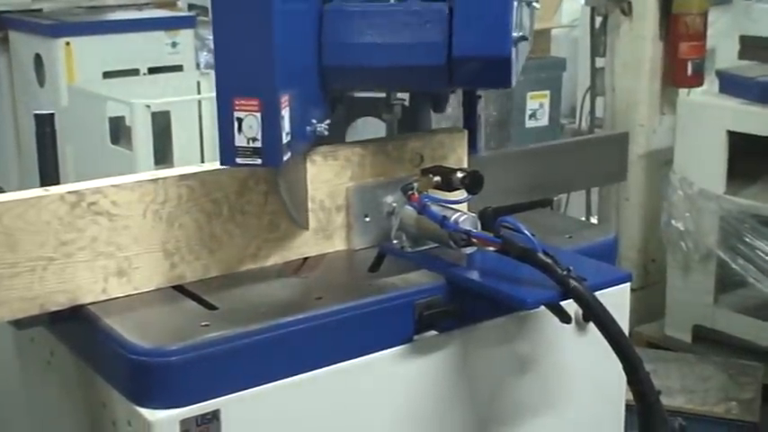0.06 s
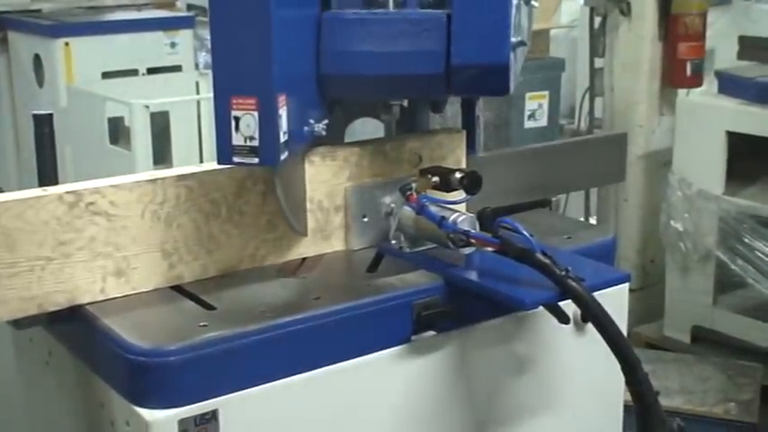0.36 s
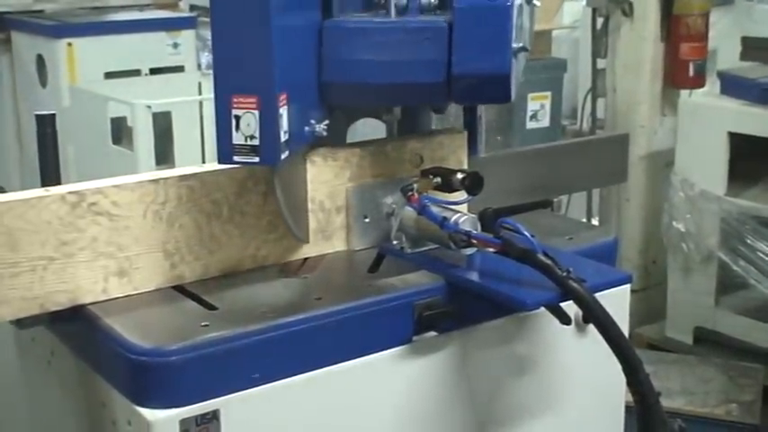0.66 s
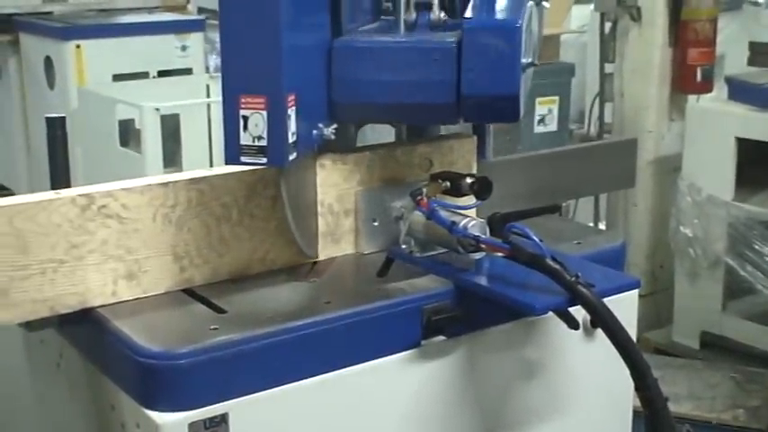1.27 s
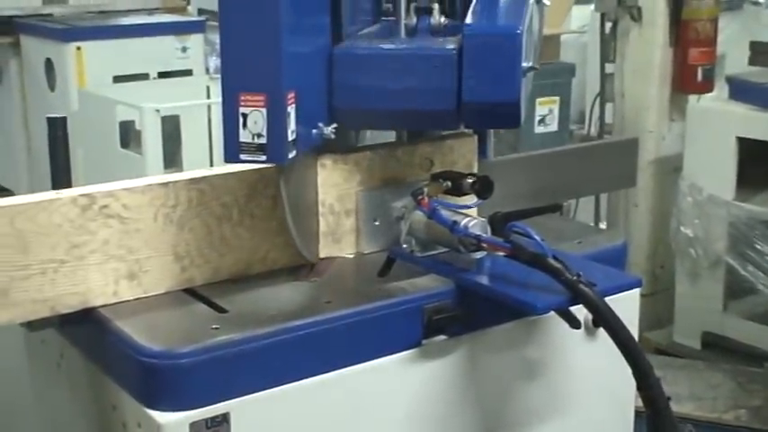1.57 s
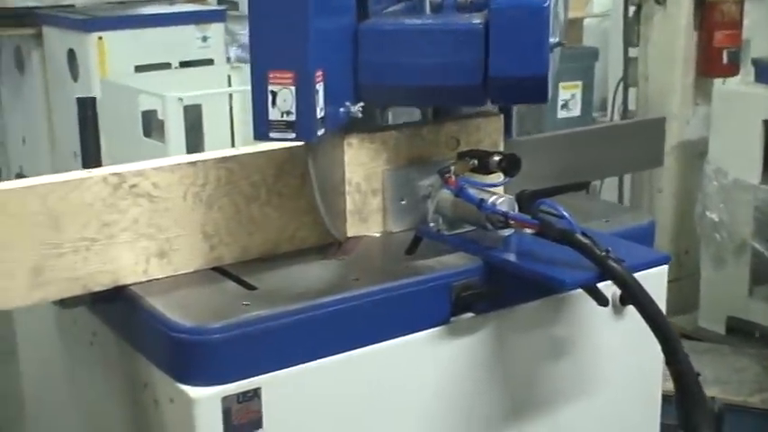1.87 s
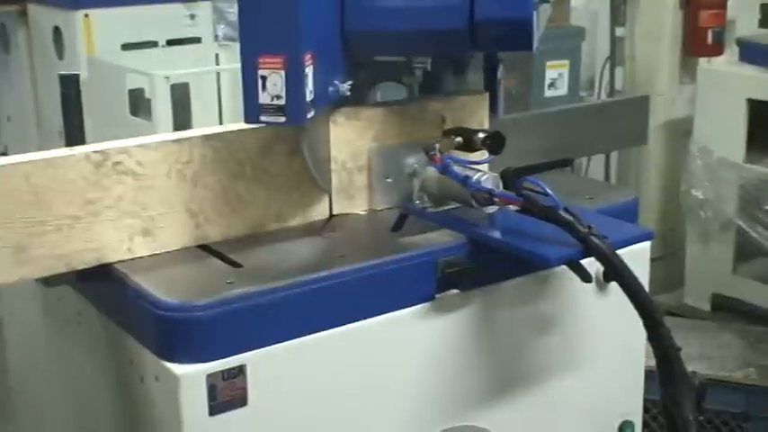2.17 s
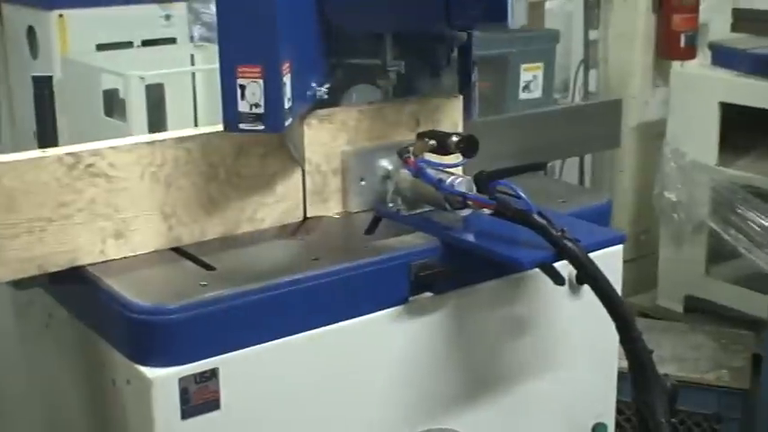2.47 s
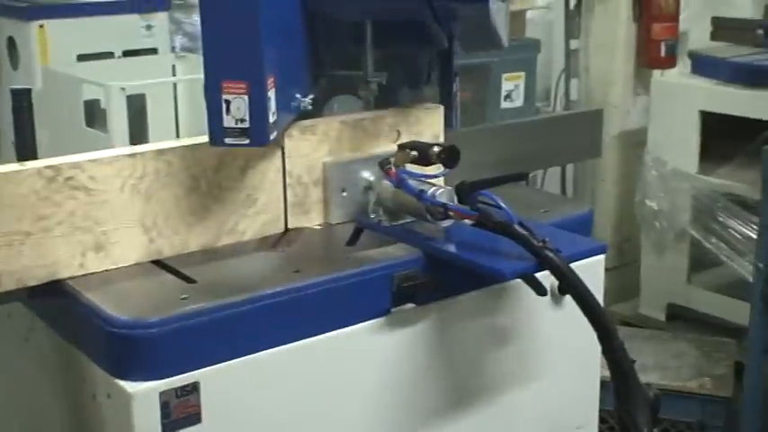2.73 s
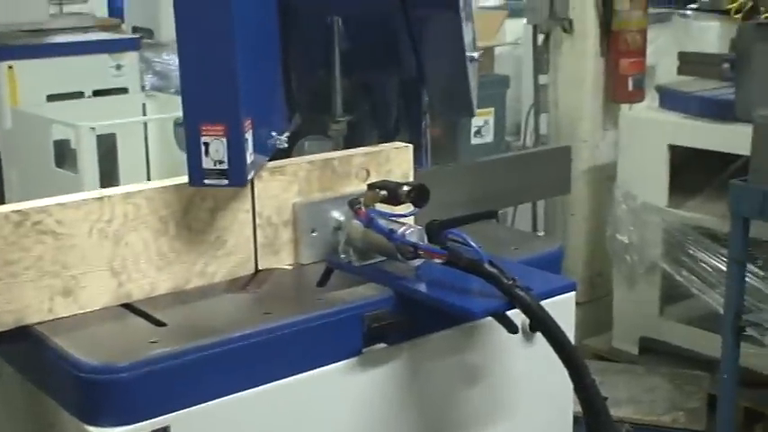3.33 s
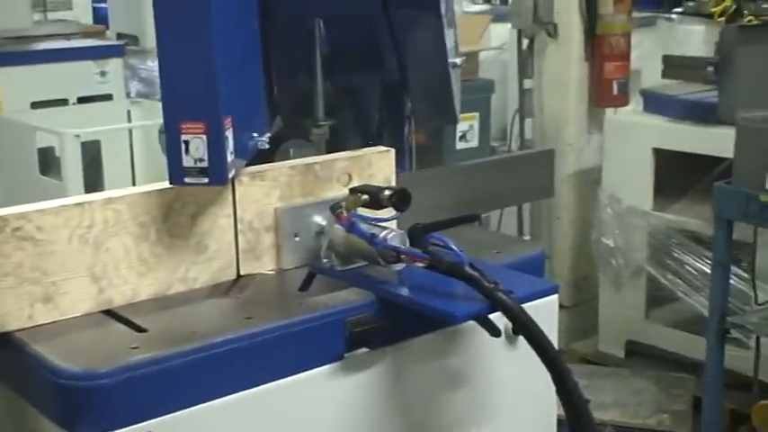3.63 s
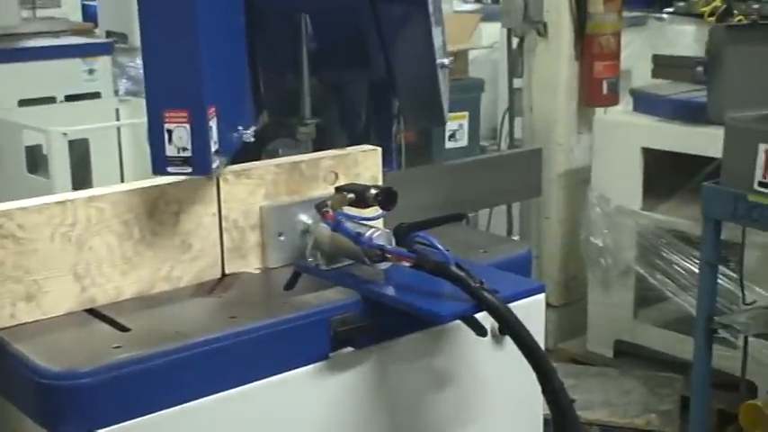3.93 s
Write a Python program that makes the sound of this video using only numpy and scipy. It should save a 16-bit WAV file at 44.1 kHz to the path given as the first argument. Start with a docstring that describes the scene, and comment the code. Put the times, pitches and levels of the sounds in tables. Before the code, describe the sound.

A powered mitre saw whines into a wooden board, tearing off chips. From about 1.3 seconds it slows slightly and gives a rough, pulsing rasp. Compressed air starts hissing at 1.6 seconds. From 2 seconds the rising blade rubs in its slot with brief high tones while the board drones. Saw and hiss fade by about 3.4 seconds, leaving the dust extractor that rushes and hums throughout.

```python
"""A pneumatic mitre saw cuts a clamped board while a dust extractor rushes and hums throughout.
First the teeth whine as they enter the wood and tear off chips. Deep in the cut the blade slows
a little and rasps once a turn. Then compressed air hisses through the return stroke, and the rising
blade rubs in its slot with brief high tones while the board drones. The saw fades, leaving the extractor."""
import sys
import numpy as np
from scipy import signal
from scipy.fft import rfft, irfft
from scipy.io import wavfile
from scipy.ndimage import uniform_filter1d

SR = 44100
rng = np.random.default_rng(int(sys.argv[2]) if len(sys.argv) > 2 else 0)


def dump_mix(stems):
    """Bounce the given channels to the path in sys.argv[1] as a 16-bit WAV at rate SR."""
    frames = np.atleast_2d(stems).T  # one column per channel
    limited = np.clip(frames, -1, 1)  # hard clip at full scale
    pcm = np.round(limited * 32767).astype(np.int16)
    wavfile.write(sys.argv[1], SR, pcm)


N = 176400
TIME_S = np.arange(N) / SR
TOP_HZ = 16750


def undb(db):
    """Turns decibels into a gain."""
    return 10 ** (np.asarray(db) / 20)

def curve(table, column=1):
    """Joins a table's points in time with straight lines."""
    rows = np.array(table, float)
    return np.interp(TIME_S, rows[:, 0], rows[:, column])

def colour(table, hz):
    """Looks up a table's gain at each frequency."""
    rows = np.array(table, float)
    return undb(np.interp(np.log(hz + 1), np.log(rows[:, 0]), rows[:, 1]))

def wander(rate_hz):
    """A smooth random wiggle, typically of size 1."""
    hold = max(int(SR / rate_hz), 2)
    steps = np.repeat(rng.standard_normal(N // hold + 1), hold)
    smooth = uniform_filter1d(uniform_filter1d(steps, hold), hold)[:N]
    return smooth / smooth.std()

def pan(x, left_db):
    """Makes a sound louder on the left than on the right."""
    return x * undb(np.array([[left_db], [-left_db]]) / 2)

# Reflections compared with the direct sound: frequency_hz, level_db
REFLECTIONS = [(60, -33), (700, -10.5), (1500, -13.5), (4400, -13.5), (8100, -3.5), (13000, -19.5)]
# How far the direct sound leans left: frequency_hz, left_minus_right_db
LEFT_LEAN = [(60, 1), (400, 4), (4400, -.5), (8100, 1), (15000, 3)]
def spread(direct, reflected):
    """Mixes a sound and its reflections into stereo."""
    hz = np.fft.rfftfreq(N, 1 / SR)
    mid = rfft(direct)
    side = rfft(reflected) * colour(REFLECTIONS, hz)
    lean = np.sqrt(colour(LEFT_LEAN, hz))
    return irfft(np.array([mid * lean + side, mid / lean - side]), N)

def noise(table, grain_db=0):
    """Stereo noise: the table sets its colour, not its level; grain makes it gritty."""
    hz = np.fft.rfftfreq(N, 1 / SR)
    white = rng.standard_normal((2, N)) * undb(grain_db * wander(3000))
    bass_cut = hz ** 4 / (hz ** 4 + 58 ** 4)
    x = irfft(rfft(white) * colour(table, hz) * bass_cut, N)
    return spread(*(x / x.std()))

def tone(cycles, flutter_db, flutter_hz, jitter_rad):
    """A tone whose level flutters; jitter makes it rough."""
    flutter = undb(flutter_db * wander(flutter_hz))
    x = flutter * np.sin(2 * np.pi * cycles + jitter_rad * wander(90))
    return x / x.std()

# Colour of the suction: frequency_hz, level_db
SUCTION_COLOUR = [(55, -12), (105, -2), (400, -3), (820, -7), (1400, -0.5), (2250, 1), (3600, -8),
                  (5500, -11.5), (7800, -17.5), (9200, -12.5), (11000, -21.5), (13500, -14.5), (16500, -35)]
# How loud the background is heard; it dips during the cut and return: time_s, rush_db, hum_db
BACKGROUND_HEARD = [(1.2, -40, -57.5), (1.28, -41, -67), (2.05, -45.5, -69), (3.1, -34.5, -64),
                    (3.35, -30, -57), (4, -28.5, -54)]
def extractor(hum_hz=44):
    """Suction rushes and the fan hums low."""
    rush = noise(SUCTION_COLOUR) * undb(curve(BACKGROUND_HEARD))
    hum = np.sqrt(2) * np.sin(2 * np.pi * hum_hz * TIME_S)
    return rush + pan(hum * undb(curve(BACKGROUND_HEARD, 2)), 1)

# How fast the blade spins: time_s, turns_per_s
BLADE_SPEED = [(1.0, 45.82), (1.22, 45.78), (1.32, 45.02), (1.42, 44.9), (1.85, 45.22), (2.06, 45.0),
               (2.45, 45.5), (2.88, 45.68), (3.02, 45.36)]
def blade_turns():
    """Counts the turns so far; the blade slows a little in the cut."""
    return np.cumsum(curve(BLADE_SPEED) * (1 + .000312 * wander(12.47))) / SR

# Whine at 1, 2 and 3 times the rate of tooth strikes: time_s, first_db, second_db, third_db
WHINE_LOUDNESS = [(.25, -23.5, -31, -26), (.56, -21, -36, -27.5), (.78, -19.5, -42, -44),
                  (1.04, -21, -33, -41), (1.12, -24.5, -33, -43), (1.24, -30.5, -39, -39),
                  (1.255, -29, -35, -43), (1.36, -40, -44, -47), (1.94, -41, -48, -53),
                  (2.03, -30, -31, -38), (2.13, -32, -44, -35), (2.42, -42, -38, -35),
                  (2.9, -30.5, -31.5, -47), (3.25, -54, -66, -70)]
# Where each of those three tones sits: left_minus_right_db
WHINE_PLACES = [-2.4, 9.5, 0.5]
def whine(turns, teeth=100):
    """Teeth strike the wood in turn, rougher as the blade binds and surging when they grab."""
    binding_rad = np.interp(TIME_S, (1.1, 1.27), (0, .62))
    grabs_s = (1.148, 1.218, 1.239, 2.026, 2.068)
    surge_db = 7.5 * sum(np.exp(-((TIME_S - at) / .008) ** 2) for at in grabs_s)
    out = 0
    for k, left_db in enumerate(WHINE_PLACES, start=1):
        note = tone(k * teeth * turns, .4 + .6 * k, flutter_hz=36, jitter_rad=.1 * k + binding_rad)
        out += pan(note * undb(curve(WHINE_LOUDNESS, k) + surge_db), left_db)
    return out

# Tones of the tooth groups: multiple_of_group_rate, shallow_cut_db, deep_cut_db
GROUP_NOTES = [(1, -40, -48), (3, -37, -48), (4, -41, -38.5), (6, -43, -37.5), (7, -40, -36.5),
               (8, -40, -43.5), (9, -40, -41), (11, -43, -46), (12, -43.5, -44), (13, -39, -46),
               (14, -38, -47)]
# Their loudness, and that of a strong tone at twice the group rate: time_s, added_db, strong_db
GROUP_LOUDNESS = [(0, 0, -30), (1.04, 0, -30), (1.13, 4, -40), (1.19, 3, -26), (1.235, 3, -24),
                  (1.27, -6, -42), (1.5, -40, -70)]
def tooth_groups(turns, groups=20, sway_hz=9.5):
    """Repeating groups of teeth add tones that swell and sink as the blade sways."""
    notes = 0
    for multiple, shallow_db, deep_db in GROUP_NOTES:
        depth = .6 if multiple in (4, 6, 7, 12) else .3
        swing = np.sin(2 * np.pi * (sway_hz * TIME_S + rng.random()) + wander(4.1))
        sway = (1 + depth * swing) / np.sqrt(1 + depth ** 2 / 2)
        gain = undb(np.interp(TIME_S, (0, 1.1), (shallow_db, deep_db)))
        notes += gain * sway * tone(multiple * groups * turns, 1, flutter_hz=20, jitter_rad=.15)
    notes *= undb(curve(GROUP_LOUDNESS))
    strong = tone(2 * groups * turns, 1, flutter_hz=30, jitter_rad=.12) * undb(curve(GROUP_LOUDNESS, 2))
    return pan(notes, 1) + pan(strong, 2.4)

# Colours of the tearing chips and the grumbling board: frequency_hz, level_db
CHIP_COLOUR = [(110, -32), (420, -5.5), (850, -8), (1400, -2), (2100, 3.5), (3300, -4), (4500, -0.5),
               (7300, -8), (9000, -5.5), (11000, -14), (13500, -4.5), (16500, -17)]
GRUMBLE_COLOUR = [(90, -10), (210, 2.5), (450, -0.5), (750, 1.5), (1300, -2), (3000, -21)]
# Loudness of each: time_s, level_db
CHIP_LOUDNESS = [(0, -26), (.95, -25.5), (1.235, -22), (1.265, -25), (1.4, -30.5), (1.92, -30.5),
                 (2.01, -24), (2.08, -35.5), (3.1, -32.5), (3.3, -53)]
GRUMBLE_LOUDNESS = [(0, -45), (.9, -40.5), (1.22, -32), (1.27, -52), (1.6, -39), (1.98, -39.5),
                    (2.1, -50.5)]
def chips_and_board(turns):
    """Chips tear off and the board grumbles, both throbbing once a turn."""
    throb = (1 + .087 * np.sin(2 * np.pi * turns)) * undb(.62 * wander(30.7))
    tearing = noise(CHIP_COLOUR, grain_db=1.9) * undb(curve(CHIP_LOUDNESS))
    grumble = noise(GRUMBLE_COLOUR) * undb(curve(GRUMBLE_LOUDNESS))
    return throb * (tearing + grumble)

def chip_spray(peak_s=1.05, half_length_s=.018, level_db=-26):
    """Stray chips hit the guard in one short, bright burst."""
    burst = np.exp(-((TIME_S - peak_s) / half_length_s) ** 2)
    return noise([(5000, -18), (14000, -2)]) * undb(level_db) * burst

def scrape(turns, colour_table, tones, scatter_db, slip_turns):
    """The blade's side scrapes nearly the same pattern each turn; it shifts as the blade travels."""
    size = 8192  # points in one turn
    multiples = np.arange(size // 2 + 1)
    hz = multiples * BLADE_SPEED[0][1]
    loops = []
    for _ in range(2):
        scatter, phase = rng.standard_normal((len(hz), 2)).T
        gain = colour(colour_table, hz) * undb(scatter_db * scatter) * (multiples > 1) * (hz < TOP_HZ)
        for multiple, db in tones:
            gain[round(multiple)] = undb(db)
        pattern = irfft(gain * np.exp(2j * np.pi * phase)) * size / 2
        position = (turns + slip_turns * wander(120)) % 1
        loops.append(np.interp(position * size, np.arange(size), pattern))
    a, b = loops
    shift = .3 * wander(14)
    return spread(np.cos(shift) * a + np.sin(shift) * b, np.cos(shift) * b - np.sin(shift) * a)

# Colour of the rasp: frequency_hz, level_db
RASP_COLOUR = [(90, -66), (200, -59), (750, -53), (1500, -47.5), (1850, -45.5), (2200, -43.5), (2700, -46),
               (3400, -50.5), (4400, -50), (7000, -65), (17000, -81)]
# Tones that stand out of it: cycles_per_turn, level_db
RASP_TONES = [(10, -42.5), (15, -45.5), (24, -40), (27, -44.5), (34, -37.5), (36, -38), (50, -40)]
# Its loudness: time_s, added_db
RASP_LOUDNESS = [(1.08, -40), (1.28, -5.5), (1.42, 0.5), (1.56, 3.5), (1.98, 3.5), (2.08, -13), (2.4, -34)]
def rasp(turns):
    """Deep in the cut the slightly warped blade scrapes, and buzzes as it presses once a turn."""
    scraping = scrape(turns, RASP_COLOUR, RASP_TONES, scatter_db=3, slip_turns=.0005)
    press = 1 + np.cos(2 * np.pi * turns)
    buzz = undb(-37) * press * tone(46 * turns, 1, flutter_hz=20, jitter_rad=.4)
    return (scraping + buzz) * undb(curve(RASP_LOUDNESS))

# Brief high tones of the blade: peak_s, length_s, pitch_hz, level_db
BLADE_NOTES = [(1.29, .08, 4310, -34), (2.02, .07, 4595, -30), (2.27, .24, 2533, -34.5),
               (2.27, .28, 3167, -36), (2.18, .17, 3610, -37), (2.5, .32, 2731, -35.5),
               (2.36, .35, 6352, -38.5), (2.55, .3, 3335, -35), (2.84, .16, 3882, -35.5),
               (2.9, .18, 3652, -33.5)]
def blade_tones():
    """The spinning blade gives brief, rough high tones, one after another."""
    out = 0
    for peak_s, length_s, pitch_hz, level_db in BLADE_NOTES:
        swell = undb(level_db) * np.exp(-2 * ((TIME_S - peak_s) / length_s) ** 2)
        out += swell * tone(pitch_hz * TIME_S, 2, flutter_hz=60, jitter_rad=.45)
    return out

# Colour of the escaping air: frequency_hz, level_db
HISS_COLOUR = [(600, -32), (3600, -9), (4500, 3.5), (5500, 1), (7500, -0.5), (9200, 3.5), (11500, -6.5),
               (14500, -2), (16500, -5.5)]
# Its loudness: time_s, level_db
HISS_LOUDNESS = [(1.585, -68), (1.605, -26), (2.1, -29), (3.1, -24.5), (3.24, -22.5), (3.32, -29.5),
                 (3.44, -40.5)]
def air_hiss():
    """Compressed air leaves the cylinder on the return stroke."""
    return noise(HISS_COLOUR, grain_db=1.3) * undb(curve(HISS_LOUDNESS) + .47 * wander(25.43))

# Colour of the rubbing: frequency_hz, level_db
RUB_COLOUR = [(150, -65.5), (650, -54), (1400, -54.5), (2100, -47), (3200, -52.5), (4600, -46), (5500, -56),
              (9000, -68), (17000, -62)]
# Tones that stand out of it: cycles_per_turn, level_db
RUB_TONES = [(40, -41), (45, -36.5)]
# Its loudness: time_s, added_db
RUB_LOUDNESS = [(1.8, -72), (2.02, -3.5), (2.3, 0.5), (2.8, 1), (3.0, -1), (3.07, -14), (3.4, -33)]
def rub(turns):
    """The blade rubs the sides of its slot on the way up."""
    scraping = scrape(turns, RUB_COLOUR, RUB_TONES, scatter_db=4.5, slip_turns=.00034)
    return scraping * undb(curve(RUB_LOUDNESS))

# Low tones of the board: cycles_per_turn, level_db
DRONE_TONES = [(9, -48.5), (13, -48), (14, -43.5), (17, -43.5), (25, -46.5)]
# Their loudness: time_s, added_db
DRONE_LOUDNESS = [(2.2, -35), (2.42, -1), (3.0, 1.5), (3.12, -40)]
def board_drone(turns):
    """The board sounds low, wavering tones as the rising blade drags along the cut."""
    notes = sum(undb(db) * tone(k * turns, 2, flutter_hz=10, jitter_rad=.2) for k, db in DRONE_TONES)
    return pan(notes * undb(curve(DRONE_LOUDNESS)), 2.8)

def scene():
    """One spinning blade drives the cutting and rubbing; extractor and air sound beside it."""
    turns = blade_turns()
    entering = whine(turns) + tooth_groups(turns) + chips_and_board(turns) + chip_spray()
    rising = air_hiss() + rub(turns) + board_drone(turns)
    return extractor() + entering + rasp(turns) + blade_tones() + rising

def record(dry):
    """Cuts off the very highest treble."""
    return signal.sosfilt(signal.ellip(10, .2, 80, TOP_HZ, fs=SR, output="sos"), dry)

dry = scene()
out = record(dry)
dump_mix(out)
```